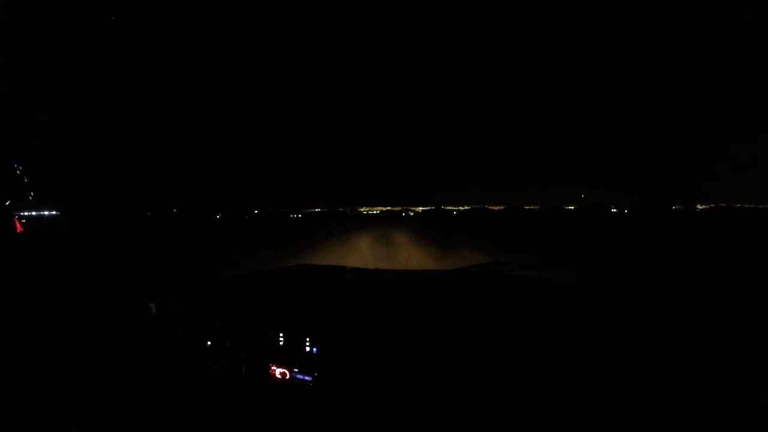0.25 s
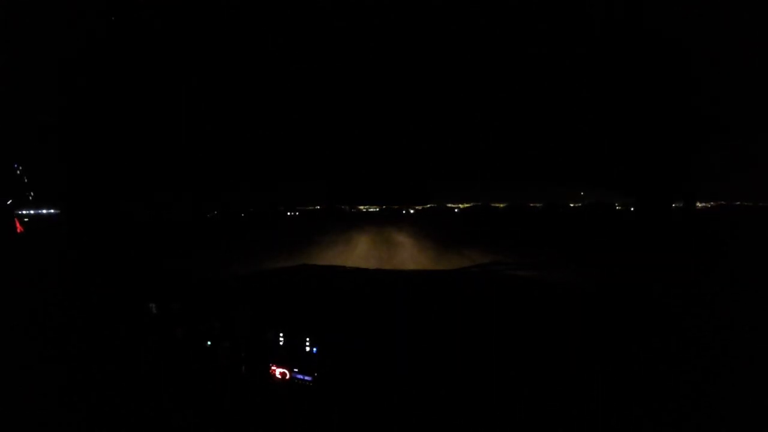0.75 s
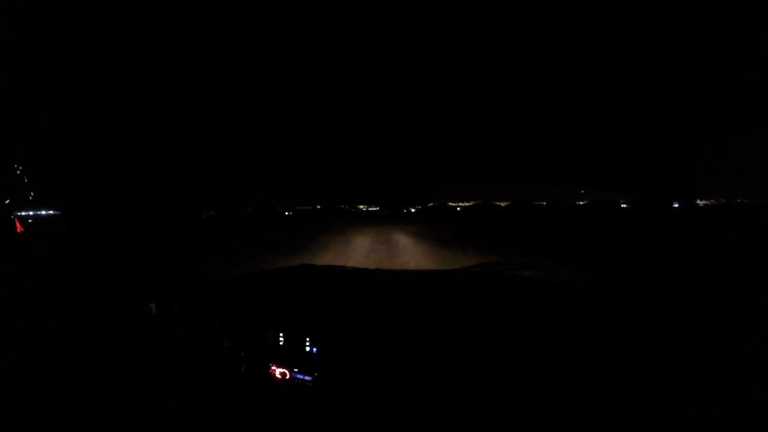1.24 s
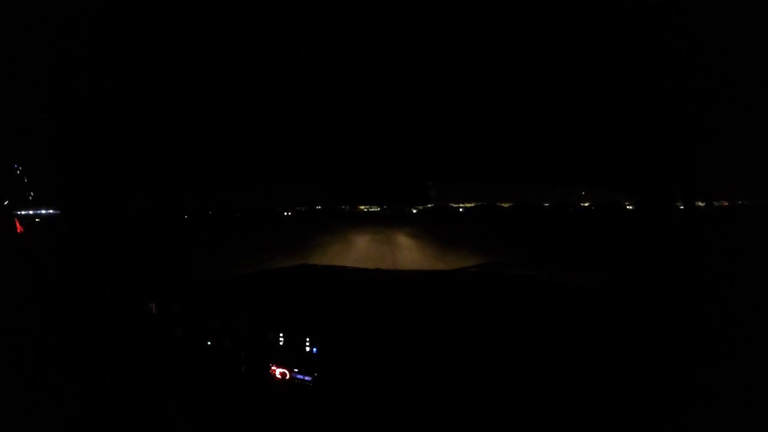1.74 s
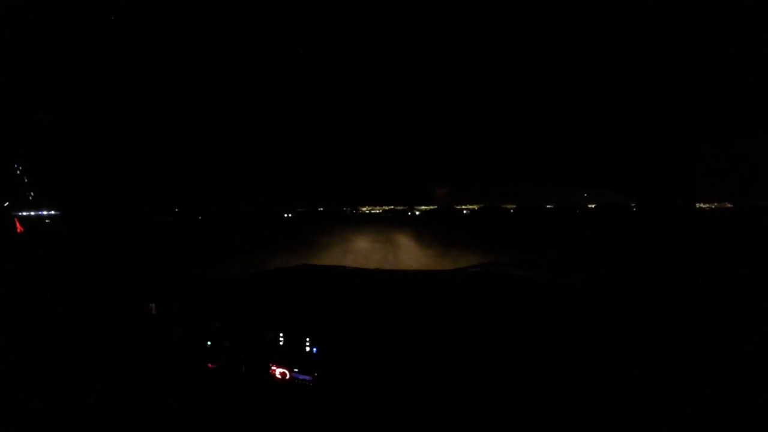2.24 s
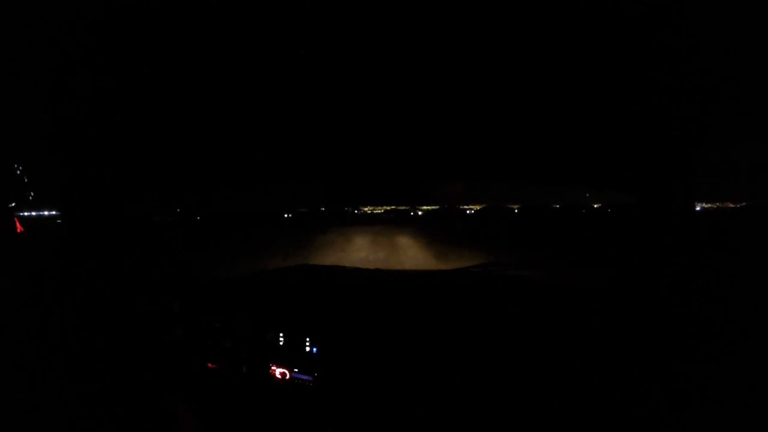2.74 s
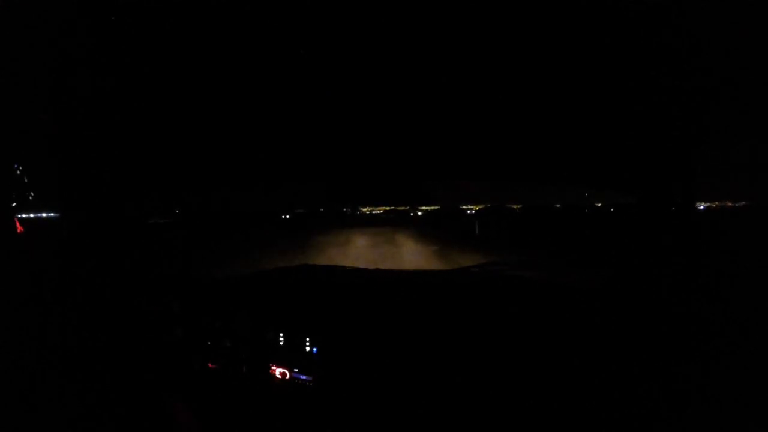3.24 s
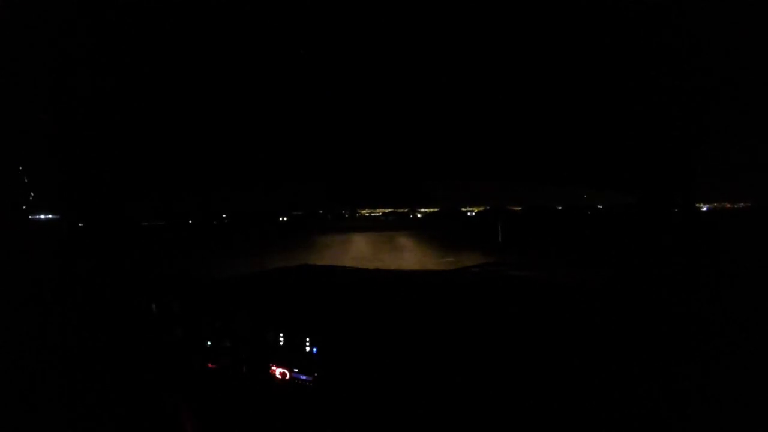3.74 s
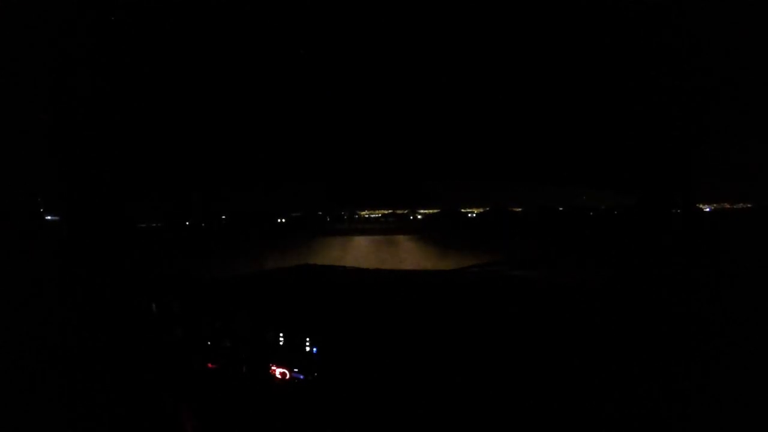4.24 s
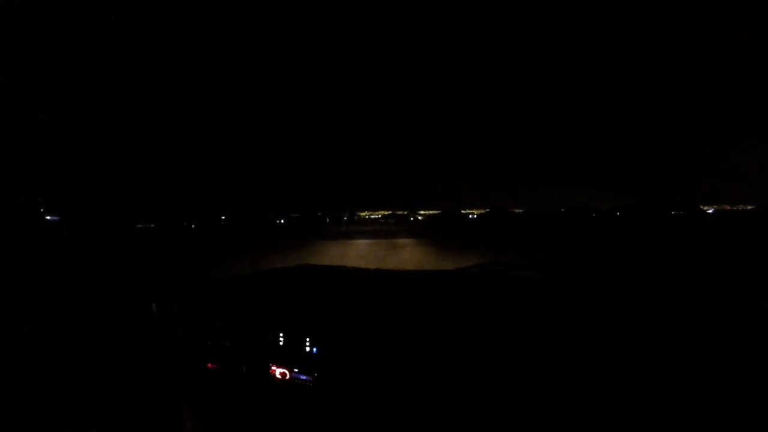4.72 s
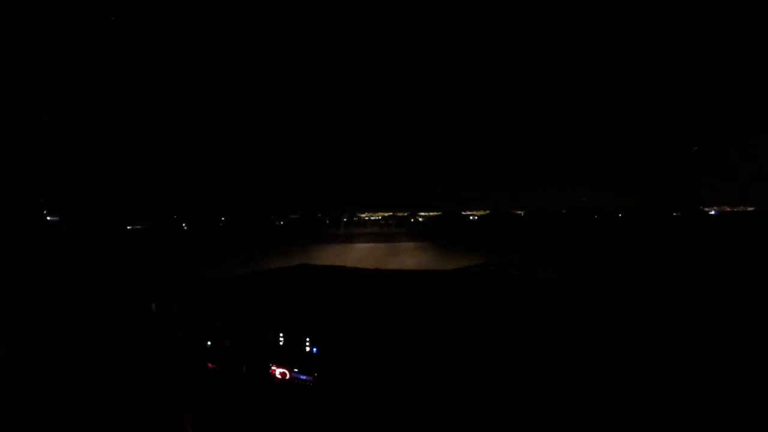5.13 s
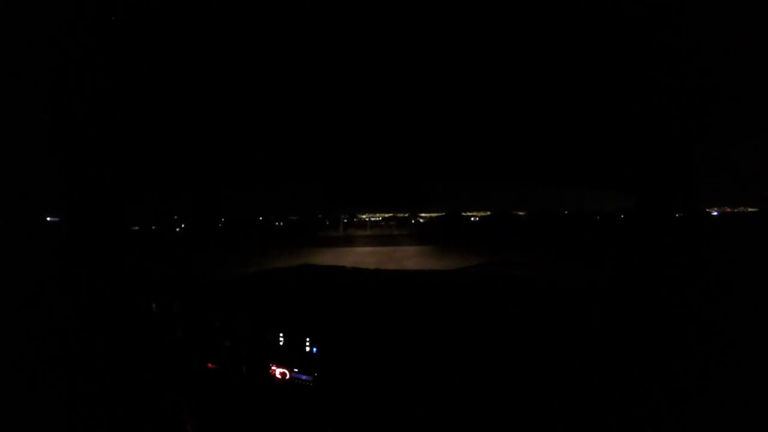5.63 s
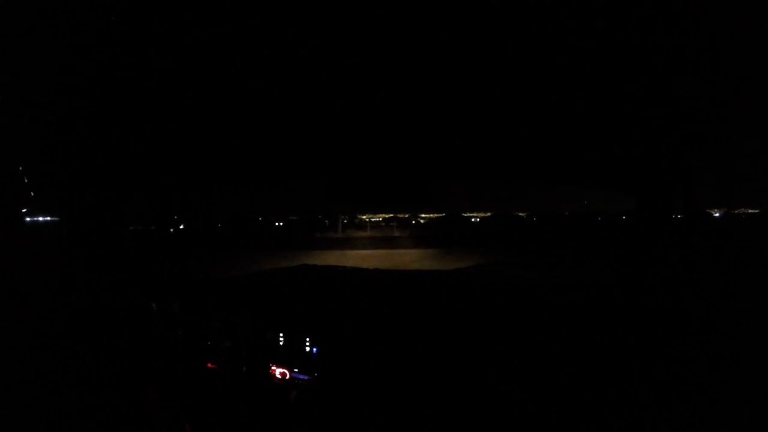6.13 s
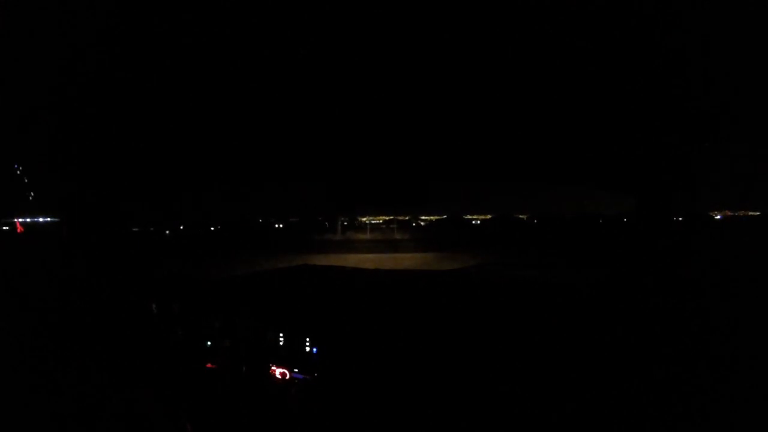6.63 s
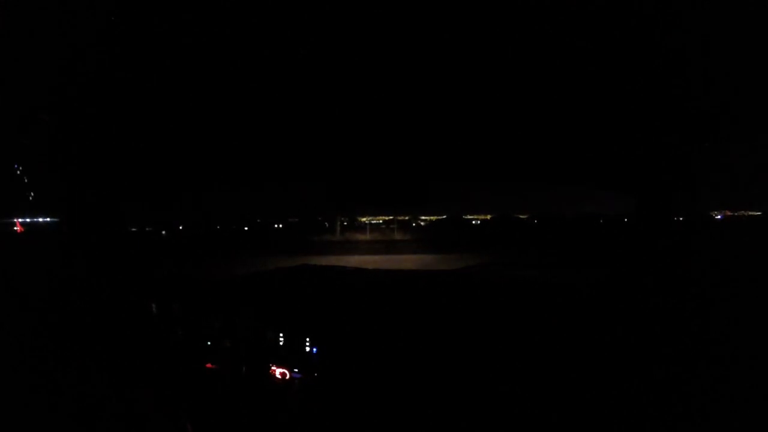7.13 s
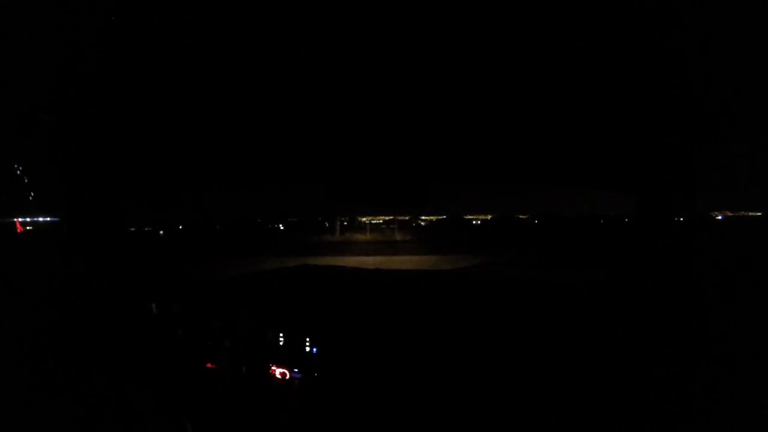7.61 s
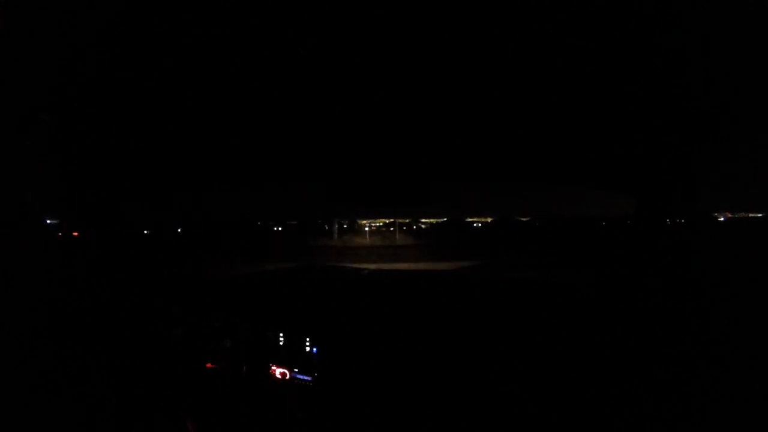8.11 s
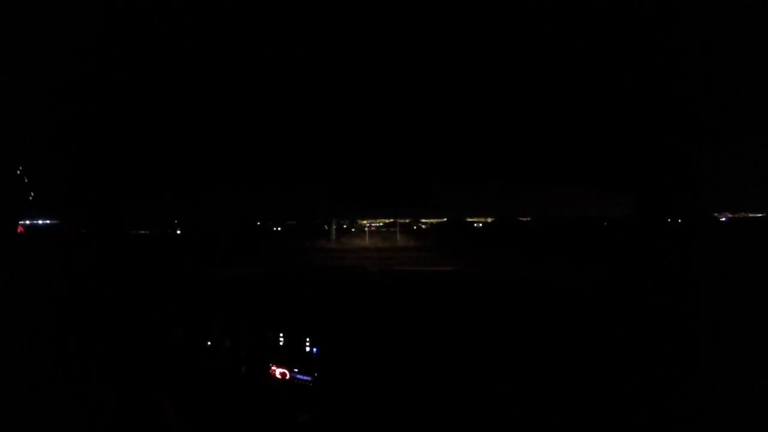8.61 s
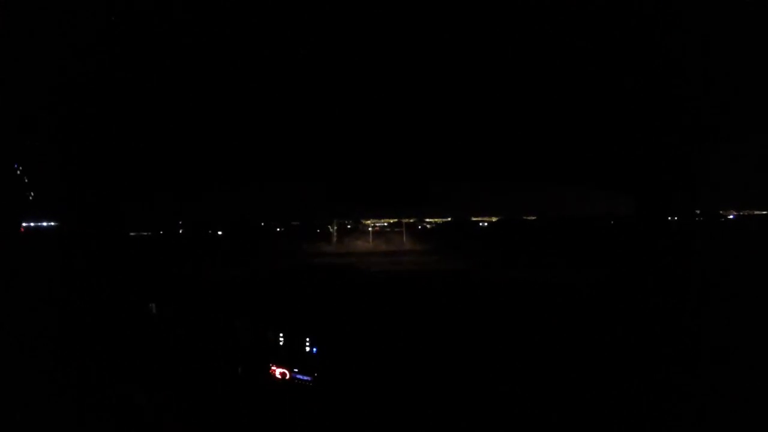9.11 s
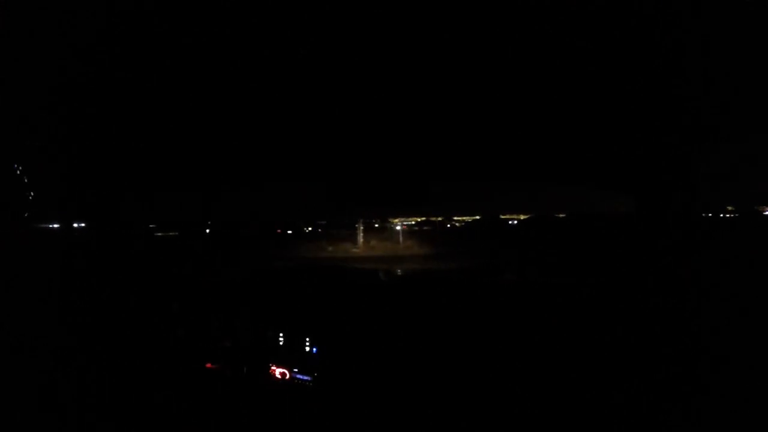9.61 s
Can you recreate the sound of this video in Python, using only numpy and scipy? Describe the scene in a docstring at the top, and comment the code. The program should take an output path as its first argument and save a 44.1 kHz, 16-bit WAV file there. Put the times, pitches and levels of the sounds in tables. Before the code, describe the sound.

From the driver's seat of a pickup at night, a V8 settles to a low uneven burble over soft road rumble and tyre roar. The turn signal ticks crisply throughout, trim rattles now and then, and air hisses. Near the end a sharp click cuts to a booming exhaust whose revs sag and climb.

```python
"""Inside the cab of a pickup at night, heard from the driver's seat: its V8 burbles at low revs over road rumble.
Engine tones are sines locked to the crank; road, tyres and fan are shaped noise; the turn signal ticks in
bright noise bursts, loose trim rattles and a thin tone sings now and then.
Near the end the sound jumps, with a click, to a later moment: the exhaust booms, the revs sag and climb again."""
import sys
import numpy as np
from scipy import signal
from scipy.fft import rfft, irfft
from scipy.io import wavfile
from scipy.ndimage import map_coordinates

SR = 44100
rng = np.random.default_rng(int(sys.argv[2]) if len(sys.argv) > 2 else 0)


def unload_audio(sound):
    """Save the sound as a 16-bit wav file, at the path given as the first command line argument."""
    columns = np.transpose(np.atleast_2d(sound))
    # keep every value between -1 and 1, then stretch to whole-number steps
    steps = np.round(np.clip(columns, -1, 1) * 32767)
    wavfile.write(sys.argv[1], SR, steps.astype(np.int16))


N = 434826

JUMP_S = 8.0308  # the later moment starts here
CUTOFF_HZ = 15200  # the sound is cut off steeply above this
TIME = np.arange(N) / SR
LATER = TIME >= JUMP_S
FREQS = np.maximum(np.fft.rfftfreq(N, 1 / SR), 1)


def from_db(db):
    """Decibels to gain."""
    return 10 ** (np.asarray(db) / 20)


def rms_one(x):
    """Scale to rms 1."""
    return x / np.sqrt(np.mean(x ** 2) + 1e-20)


def in_time(rows):
    """Each column of a curve, interpolated at every sample."""
    seconds, *columns = np.transpose(rows)
    return [np.interp(TIME, seconds, column) for column in columns]


def drift(rate):
    """Smooth chance with spread 1 that changes about rate times a second."""
    knots = rng.standard_normal(4000)
    coarse = TIME[::50]
    curve = map_coordinates(knots, [coarse * rate], order=3, mode="wrap")
    return rms_one(np.interp(TIME, coarse, curve))


def burst(t, rise_s, t60):
    """Envelope that swells up to t = 0 and then dies away by 60 dB in t60 seconds."""
    return np.clip(1 + t / rise_s, 0, 1) * from_db(-60 * np.maximum(t, 0) / t60)


def spell(start_s, end_s, fade_s):
    """Envelope that fades in, holds from start to end and fades out."""
    return np.clip(1 + np.minimum(TIME - start_s, end_s - TIME) / fade_s, 0, 1)


def noise(spectrum):
    """Noise of rms 1 with the given spectrum, falling away past its ends."""
    hz, db = np.transpose(spectrum)
    outside = np.minimum(FREQS / hz[0], 1) * np.minimum(hz[-1] / FREQS, 1)
    gain = from_db(np.interp(np.log(FREQS), np.log(hz), db)) * outside ** 2
    return rms_one(irfft(rfft(rng.standard_normal(N)) * gain, N))


def resonant_noise(hz, width_hz, size=N):
    """Noise of rms 1 in one resonance."""
    r = np.exp(-np.pi * width_hz / SR)
    poles = [1, -2 * r * np.cos(2 * np.pi * hz / SR), r * r]
    return rms_one(signal.lfilter([1, 0, -1], poles, rng.standard_normal(size)))


def band_noise(hz, ratio, size):
    """Noise of rms 1 from hz / ratio to hz * ratio, kept below the cutoff."""
    ratio = max(ratio, 1.05)
    sos = signal.butter(2, [hz / ratio, min(hz * ratio, CUTOFF_HZ)], "band", fs=SR, output="sos")
    return rms_one(signal.sosfilt(sos, rng.standard_normal(size)))


def reflected(x, count=10):
    """Short reflections from glass and dashboard comb a steady sound; rms 1."""
    lags = (rng.uniform(.002, .022, count) * SR).astype(int)  # delays of 2 to 22 ms
    echoes = sum(np.roll(x, lag) for lag in lags)
    return rms_one(x + from_db(-22.5) * echoes)


def engine_speed():
    """Firings per second: low revs, then after the jump a sag and a climb."""
    # Engine speed at low revs. Each row: time in seconds, firings per second.
    coast_speed = [(0, 61), (.65, 52.8), (1.27, 50.7), (1.6, 57.8), (1.9, 60), (2.5, 58.2), (3.7, 57.1),
                   (4.2, 55.8), (4.9, 57.1), (6.2, 56.9), (8.03, 58)]
    # Engine speed after the jump. Each row: time in seconds, firings per second.
    pull_speed = [(8.03, 94.8), (8.32, 96.6), (8.6, 86), (8.92, 60.5), (9.13, 86), (9.39, 81),
                  (9.86, 107.5)]
    return np.where(LATER, in_time(pull_speed)[0], in_time(coast_speed)[0])


def cycle_angle(firings_per_s, wobble, count=8):
    """Angle of the four-stroke cycle, in which all cylinders fire once; the crank runs a little unevenly."""
    uneven_rate = firings_per_s * (1 + wobble * drift(14))
    return 2 * np.pi * np.cumsum(uneven_rate) / (count * SR)


def overtones(angle, orders, rough, rough_rate):
    """Lines at whole multiples of the cycle rate, each wavering as the combustion varies."""
    total = 0
    for k, db in orders:
        waver = 1 + rough * drift(rough_rate)
        line = np.sin(round(k) * angle + rng.uniform(0, 2 * np.pi))
        total = total + from_db(db) * np.sqrt(2) * waver * line
    return total


def firing_tone(angle, order, rough):
    """One tone locked to the engine cycle, about rms 1."""
    return overtones(angle, [(order, 0)], rough, rough_rate=18)


def coasting_engine(angle, firings):
    """Firing hum and its octave; unequal exhaust paths fill in the other multiples as a loping burble."""
    # Effort of the engine at low revs. Each row: time in seconds, dB above cruising.
    effort = [(0, -14), (.9, -4), (1.4, -1.5), (1.9, 3.5), (3.2, .5), (4.3, -1), (5.3, -1), (6.5, -0.5),
              (8.03, 1)]
    # Burble of the uneven exhaust. Each row: multiple of the four-stroke cycle rate, relative level in dB.
    burble_lines = [(2, -17), (3, -5), (5, -23), (6, -11), (11, -12.5), (12, -16), (13, -0.5), (14, -12),
                    (15, -6.5), (19, -18), (20, -7), (21, -9.5), (22, -7), (23, -9.5), (25, -13),
                    (28, -21.5), (29, -28.5), (31, -22), (32, -19.5), (33, -23), (34, -47), (39, -27),
                    (40, -24.5), (41, -24)]
    hum_db, hum_follows = -17, 1.35  # level when cruising; dB per dB of effort
    burble_db, burble_follows = -21.5, 0.45  # the octave follows the effort as the burble does
    octave_edge_hz, octave_fall_db_per_hz = 58, 3.5  # the octave fades above this firing rate

    effort_db, = in_time(effort)
    octave_db = -22 - octave_fall_db_per_hz * np.maximum(firings - octave_edge_hz, 0)
    hum = from_db(hum_db + hum_follows * effort_db) * firing_tone(angle, order=8, rough=0.05)
    octave = from_db(octave_db) * firing_tone(angle, order=16, rough=0.07)
    burble = from_db(burble_db) * overtones(angle, burble_lines, rough=0.083, rough_rate=10)
    return hum + from_db(burble_follows * effort_db) * (octave + burble)


def exhaust_boom(angle, firings):
    """The firing tone under load, dipping as it sweeps through a null of the cab."""
    null_hz, null_width_hz, null_depth_db = 77.1, 4.0, 6.0
    edge_hz, fall_db_per_hz = 98.1, 1.5  # the boom fades above this firing rate
    null_db = null_depth_db * np.exp(-((firings - null_hz) / null_width_hz) ** 2)
    boom_db = -10 - null_db - fall_db_per_hz * np.maximum(firings - edge_hz, 0)
    return from_db(boom_db) * firing_tone(angle, order=8, rough=0.083)


def exhaust_growl(angle, firings, octave_db, odd_db, count=72):
    """A comb of overtones sweeps through the cab's resonances and grows with the revs."""
    # What the cab passes of the growl's lines. Each row: frequency in Hz, gain in dB.
    cab_response = [(25, -2), (70, 0.5), (100, -3.5), (150, 1), (178, -11.5), (198, -4.5), (220, 1.5),
                    (245, -10), (300, -13.5), (365, -31), (425, -18.5), (480, -25), (800, -40), (1100, -39)]
    growl_db, at_hz, db_per_octave = -28.5, 96.3, 11  # level at this firing rate; growth with it
    hz, db = np.transpose(cab_response)
    cycle_hz = firings[LATER] / 8
    growl = np.zeros(N)
    for k in range(6, count):
        # even lines, the multiples of the crank rate, stand out; most of all the firing octave
        order_db = octave_db * (k == 16) + odd_db * (k % 2)
        gain = from_db(np.interp(k * cycle_hz, hz, db) + order_db)
        growl[LATER] += gain * np.sqrt(2) * np.sin(k * angle[LATER] + rng.uniform(0, 2 * np.pi))
    level_db = growl_db + db_per_octave * np.log2(firings / at_hz)
    return from_db(level_db + 1.0 * drift(40)) * growl


def intake(angle, firings):
    """With the throttle open, engine overtones drone as they pass through the intake's resonance."""
    opens_s, rise_s = 9.0, .1  # the throttle opens and the revs pick up
    airbox_hz, airbox_width_hz, airbox_db = 429, 32, -37.5
    throttle = np.clip((TIME - opens_s) / rise_s, 0, 1)
    drone = np.zeros(N)
    for k in (34, 39):
        line_hz = k * firings / 8
        resonance = 1 / (1 + ((line_hz - airbox_hz) / airbox_width_hz) ** 2)
        drone += firing_tone(angle, order=k, rough=0.45) * resonance
    return from_db(airbox_db) * throttle * drone


def pulling_engine(angle, firings):
    """Under load the exhaust booms and growls, and the intake drones."""
    growl = exhaust_growl(angle, firings, octave_db=4.0, odd_db=-5.5)
    return exhaust_boom(angle, firings) + intake(angle, firings) + growl


def valve_train(angle, level_db, low_hz, high_hz, size=4096):
    """Cams and lifters make the same fine chatter on every cycle: a dense comb of faint lines."""
    pattern = signal.resample(rng.standard_normal(size // 8), size)
    chatter = np.interp(angle / (2 * np.pi) % 1, np.arange(size) / size, pattern)
    sos = signal.butter(1, [low_hz, high_hz], "band", fs=SR, output="sos")
    twice_filtered = signal.sosfilt(sos, signal.sosfilt(sos, chatter))
    return from_db(level_db) * rms_one(twice_filtered)


def alternator(angle):
    """A faint whine geared to the engine cycle."""
    return from_db(-47.0) * firing_tone(angle, order=76, rough=0.15)


def singing(waver_hz, flutter_db):
    """A thin tone, like a pulley bearing, that comes in spells, wavering in pitch and level."""
    # Spells of the tone. Each row: start in seconds, end in seconds, pitch in Hz, level in dB.
    sing_spells = [(.72, 0.947, 1461, -47), (1.6, 1.85, 1467, -48.5), (2.9, 3.353, 1448, -49.5),
                   (3.95, 4.75, 1447, -51.5), (5.35, 6.1, 1442, -49), (9.167, 9.86, 1416, -52)]
    waver = waver_hz * drift(30)
    flutter = from_db(flutter_db * drift(19))
    tones = np.zeros(N)
    for start_s, end_s, hz, db in sing_spells:
        tone = np.sin(2 * np.pi * np.cumsum(hz + waver) / SR)
        tones += from_db(db) * spell(start_s, end_s, fade_s=0.18) * tone
    return np.sqrt(2) * flutter * tones


def road():
    """The road shakes the body; the cab drones and the tyres roar with the truck's pace."""
    # Spectra of body rumble, cab drone and tyre roar. Each row: frequency in Hz, relative dB per Hz.
    rumble_spectrum = [(14, -22.5), (22, 0), (34, 3), (48, -1), (75, -5.5), (100, -2), (140, -11),
                       (200, -25), (400, -65.5)]
    drone_spectrum = [(70, -20.5), (120, -7), (165, -0.5), (205, 0.5), (232, 0), (255, -3), (287, -1.5),
                      (350, -14), (500, -30), (1000, -71)]
    tyre_spectrum = [(200, -28.5), (340, 0.5), (440, 2.5), (560, -3.5), (630, -2.5), (690, -7), (780, -4.5),
                     (950, -6.5), (1060, -15), (1200, -13.5), (1350, -16), (1700, -21.5), (4000, -50)]
    # Unevenness of the road. Each row: time in seconds, level of the body rumble in dB.
    unevenness = [(0, -17), (.7, -19), (1.5, -22), (3, -23), (4.7, -17.5), (6.7, -21), (8, -33.5),
                  (9.15, -19.5), (9.86, -28)]
    # Pace of the truck. Each row: time in seconds, level of the tyre roar in dB.
    pace = [(0, -30), (1.4, -33.5), (4.2, -36), (8, -35.5), (8.06, -39), (9.86, -36)]
    drone_at_pace_db, drone_follows = -36, 1.23  # pace for the drone's base level; dB per dB of pace
    drone_later_db = 1.5  # raised after the jump

    rumble_db, = in_time(unevenness)
    pace_db, = in_time(pace)
    drone_db = -28 + drone_follows * (pace_db - drone_at_pace_db) + drone_later_db * LATER
    rumble = from_db(rumble_db) * noise(rumble_spectrum)
    drone = from_db(drone_db) * noise(drone_spectrum)
    return rumble + drone + from_db(pace_db) * noise(tyre_spectrum)


def loose_surface(grains_per_s, spread_db):
    """Tyres rush over the ground and flick fine grit against the body."""
    # Stretches where the tyres rush. Each row: start in seconds, end in seconds, level in dB.
    rushes = [(0, .9, -38), (9.498, 9.86, -46)]
    # Stretches of grit under the tyres. Each row: start in seconds, end in seconds, level in dB.
    grit_patches = [(6.2, 6.4, -58), (8.95, 9.45, -53.5), (9.7, 9.86, -64)]
    rushing = sum(from_db(db) * spell(start_s, end_s, fade_s=1.5) for start_s, end_s, db in rushes)
    gritty = sum(from_db(db) * spell(start_s, end_s, fade_s=0.27) for start_s, end_s, db in grit_patches)
    hits = rng.random(N) < grains_per_s / SR
    grains = hits * rng.standard_normal(N) * from_db(spread_db * drift(60))
    grit = signal.sosfilt(signal.butter(1, [1400, 3600], "band", fs=SR, output="sos"), grains)
    return rushing * band_noise(hz=706, ratio=1.185, size=N) + gritty * rms_one(grit)


def relay_snaps():
    """The relay closes and opens once per blink: (seconds, dB before the overall relay level)."""
    # Runs of the turn signal. Each row: first snap in seconds, end in seconds,
    # snap level in dB before the overall relay level.
    blinking = [(0.0232, 8.03, -34.5), (8.3376, 9.86, -38)]
    blink_s, closed_s = .7159, .3666
    opening_softer_db, spread_db = 3.5, 0.4  # opening is softer than closing; snaps vary a little
    snaps = []
    for first_s, end_s, db in blinking:
        for close_s in np.arange(first_s, end_s, blink_s):
            for delay_s, softer_db in [(0, 0), (closed_s, opening_softer_db)]:
                if close_s + delay_s < end_s:
                    snaps.append((close_s + delay_s, db - softer_db + rng.normal(0, spread_db)))
    return snaps


def turn_signal(level_db, tail_db):
    """Each relay snap is a short bright crack with a tail of cab reflections."""
    # The relay's colour behind the dashboard. Each row: frequency in Hz, relative dB per Hz.
    relay_spectrum = [(3000, -15), (4800, -8.5), (6000, -0.5), (6700, -4), (7100, -7), (7600, -5),
                      (8400, -8), (9200, -14), (10100, -10.5), (11400, -15.5), (12300, -19.5), (13200, -16),
                      (14700, -19.5)]
    envelope = np.zeros(N)
    for s, db in relay_snaps():
        near = np.abs(TIME - s) < .1
        t = TIME[near] - s - .0008  # the crack peaks just after the listed time
        crack = burst(t, rise_s=.0035, t60=0.038)
        tail = from_db(tail_db) * burst(t, rise_s=.002, t60=0.1)
        envelope[near] += from_db(db) * (crack + tail)
    return from_db(level_db) * envelope * noise(relay_spectrum)


def trim():
    """Loose trim buzzes briefly on bumps; the lower pieces ring longer."""
    # Rattles of the trim. Each row: time in seconds, peak of the envelope in dB, centre in Hz.
    rattles = [(0.286, -32, 1500), (1.862, -35.5, 1850), (2.135, -39, 2200), (2.265, -40, 2200),
               (3.511, -46, 7760), (3.725, -47, 5500), (4.61, -46, 5900), (5.276, -40.5, 6720),
               (5.572, -44, 5500), (8.87, -43, 1700), (9.241, -42, 5000)]
    cycles, reach_hz = 200, 1200  # a rattle falls 60 dB in this many cycles; its reach above the centre
    out = np.zeros(N)
    for s, db, hz in rattles:
        near = np.abs(TIME - s) < .15
        envelope = burst(TIME[near] - s, rise_s=0.0011, t60=cycles / hz)
        out[near] += from_db(db) * envelope * band_noise(hz, 1 + reach_hz / hz, size=near.sum())
    return out


def air(flutter_db):
    """Fan hiss, steady but softer after the jump, with a few breathy, fluttering whistles."""
    # Spectrum of the fan. Each row: frequency in Hz, relative dB per Hz.
    fan_spectrum = [(700, -13.5), (1150, -6), (1330, -8), (1600, -12.5), (1750, -16), (2100, -10.5),
                    (2600, -13.5), (3100, -16), (3830, -12), (5200, -21), (6300, -23), (9000, -32),
                    (11800, -36), (15000, -46)]
    # Whistles of the air flow. Each row: frequency in Hz, width in Hz, level in dB, level after the jump in dB.
    whistles = [(1423.5, 32, -46.5, -52), (1550, 23, -70, -62.5), (1640, 22, -70, -71),
                (1934, 61, -54.5, -59), (2487, 55, -60, -56)]
    out = from_db(np.where(LATER, -47.5, -43.5)) * reflected(noise(fan_spectrum))
    for hz, width_hz, db, later_db in whistles:
        whistle_db = np.where(LATER, later_db, db) + flutter_db * drift(22)
        out += from_db(whistle_db) * resonant_noise(hz, width_hz)
    return out


def jump_click(step_db, settle_s):
    """The sudden jump is a step in pressure that decays at once, heard as one sharp click."""
    return -from_db(step_db) * LATER * np.exp(-np.maximum(TIME - JUMP_S, 0) / settle_s)


def scene():
    """Everything as heard from the driver's seat."""
    firings = engine_speed()
    angle = cycle_angle(firings, wobble=.0012)
    load = np.clip((TIME - JUMP_S) / .004, 0, 1)  # the engine is under load after the jump
    exhaust = (1 - load) * coasting_engine(angle, firings) + load * pulling_engine(angle, firings)
    machinery = (1 - load) * alternator(angle)
    machinery += valve_train(angle, level_db=-42.5, low_hz=343, high_hz=906)
    machinery += singing(waver_hz=2.93, flutter_db=2.0)
    ground = road() + loose_surface(grains_per_s=4000, spread_db=2.0)
    cab = turn_signal(level_db=-9.5, tail_db=-4) + trim() + air(flutter_db=1.86)
    return (exhaust + machinery + ground + cab + jump_click(step_db=-4.5, settle_s=.002))[None]


def record(dry):
    """The highest peaks are rounded; the ends fade, and the deepest sub-bass and the top are cut."""
    out = signal.sosfilt(signal.butter(2, 14, "high", fs=SR, output="sos"), dry)
    rounded = out / (1 + (out / .9) ** 8) ** (1 / 8)
    faded = rounded * spell(.003, TIME[-1] - .003, fade_s=.003)
    return signal.sosfilt(signal.ellip(12, .1, 110, CUTOFF_HZ, fs=SR, output="sos"), faded)


dry = scene()
out = record(dry)
unload_audio(out)
```